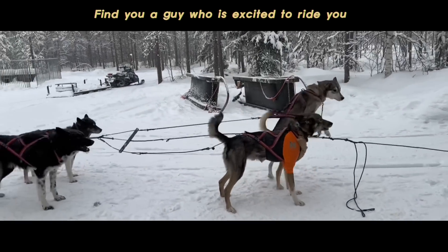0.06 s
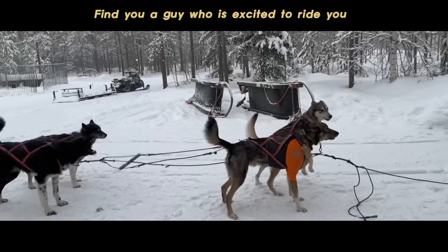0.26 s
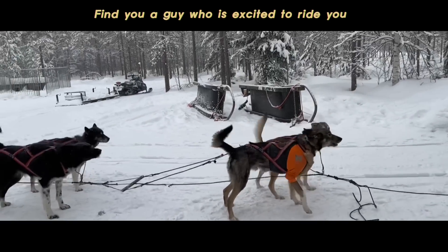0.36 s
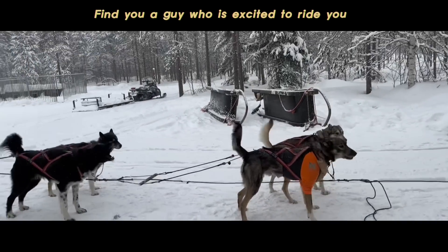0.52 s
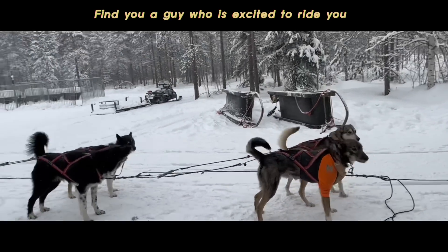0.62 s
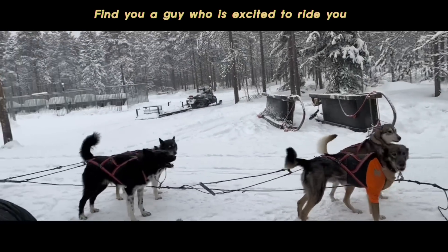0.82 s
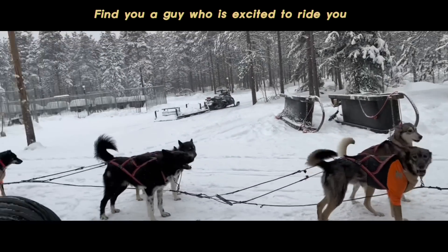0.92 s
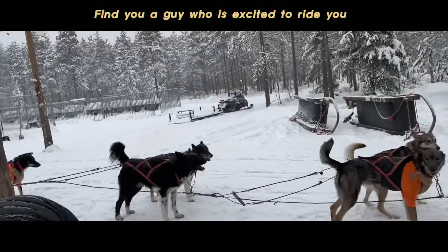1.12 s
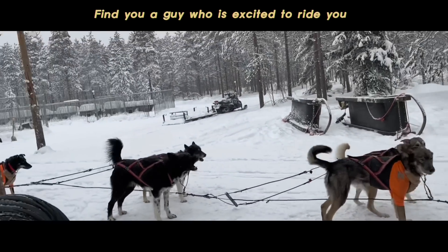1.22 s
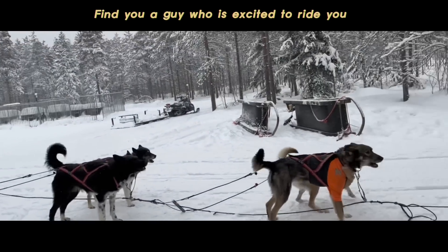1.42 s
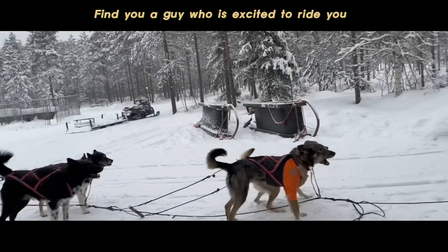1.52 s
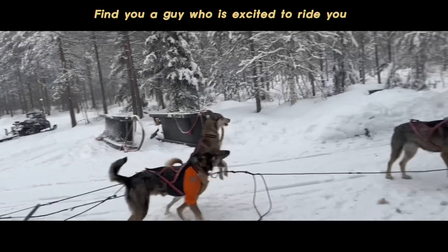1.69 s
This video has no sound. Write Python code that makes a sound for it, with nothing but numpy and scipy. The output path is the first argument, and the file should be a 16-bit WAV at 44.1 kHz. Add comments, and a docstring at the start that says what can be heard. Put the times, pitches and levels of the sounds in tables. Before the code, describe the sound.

A sled dog yelps three times, each cry starting low and cracking upward. Other dogs whine with thin nasal whistles, and a soft howl begins at the end. Paws scuff faintly on snow beside a quiet forest.

```python
"""A harnessed sled dog yelps three times on snow at a forest's edge, just after an earlier yelp ends.
Each yelp starts low, cracks up into a high register and falls away. By the source-filter principle,
the vocal folds supply harmonics and the resonances of throat and mouth weight them.
Other dogs whine and howl, with thin nasal whistles on top; paws scuff the snow,
and the trunks scatter back a faint echo over the quiet of the forest."""
import sys
import numpy as np
from scipy import signal
from scipy.fft import rfft, irfft
from scipy.io import wavfile
from scipy.ndimage import uniform_filter1d

SR = 44100
rng = np.random.default_rng(int(sys.argv[2]) if len(sys.argv) > 2 else 0)


def int16_out(signal):
    """Quantize to a 16-bit WAV file."""
    q = np.round(np.clip(np.atleast_2d(signal).T, -1, 1) * 32767)
    wavfile.write(sys.argv[1], SR, q.astype(np.int16))


N = 77175

# Contours of the vocal folds, with levels taken before the throat's filter (t/s, f/Hz, level/dB)
LOW_REGISTER = [
    [(0, 708, -7.5), (.008, 705, -26)],
    [(.175, 350, -21.5), (.193, 511, -28.5), (.204, 580.3, -11.5), (.222, 597, -10), (.232, 625, -23.5)],
    [(.437, 425, -19.5), (.453, 490, -33), (.472, 604.4, -18), (.495, 625, -17), (.507, 701, -20)],
    [(1.172, 299.8, -25), (1.203, 448, -35), (1.222, 581.3, -20.5), (1.245, 618.5, -19),
     (1.263, 687, -38.5)],
]  # one per yelp, the first already ending
HIGH_REGISTER = [
    [(.228, 907, -16.5), (.243, 987, -20), (.256, 954.5, -14.5), (.268, 994, -8.5), (.292, 1027, -11.5),
     (.303, 898, -22)],
    [(.503, 880, -20), (.519, 946.6, -18.5), (.531, 1041, -8.5), (.598, 1087, -11.5), (.611, 1043, -15.5),
     (.623, 807, -28), (.634, 601, -28.5), (.645, 464, -30.5)],
    [(1.25, 909, -26.5), (1.264, 929.7, -24.5), (1.28, 1104, -12.5), (1.3, 1154, -8), (1.319, 1108, -16),
     (1.331, 846, -22.5), (1.343, 603, -36), (1.355, 485, -31)],
]  # one per full yelp
BIPHONATION = [(.508, 595, -39), (.565, 694, -42.5), (.571, 801, -31), (.604, 840, -38)]  # second tone under the middle yelp
WHINE_CONTOURS = [
    [(.68, 1130, -59.5), (.735, 1106, -38), (.757, 1233, -35.5), (.778, 1155, -34.5), (.793, 1346, -33.5),
     (.843, 1333, -35.5), (.895, 1159, -39.5)],
    [(.89, 1172, -38.5), (.935, 1152, -36), (.955, 1177, -29), (1.025, 1170, -31.5), (1.07, 1240, -40)],
    [(.945, 1290, -31.5), (.965, 1340, -31.5), (.997, 1253, -32.5), (1.01, 1325, -31), (1.055, 1302, -28),
     (1.08, 1350, -24), (1.165, 1374, -21), (1.3, 1383, -26.5), (1.355, 1369, -27), (1.372, 1385, -45),
     (1.395, 1390, -35)],
    [(1.402, 1233, -27), (1.42, 1325, -24), (1.45, 1353, -25), (1.492, 1312, -23.5), (1.526, 1351, -31),
     (1.555, 1120, -67)],
]
HOWL_CONTOUR = [(1.45, 1096, -46.5), (1.52, 1074, -41), (1.75, 1047, -33)]
# Irregularity of the folds, one value per call
HIGH_ROUGHNESS = [.55, .06, .2]  # (roughness, 0-1)
WHINE_JITTER = [.011, .004, .002, .003]  # (fraction of the pitch)
# Nasal whistles (t/s, f/Hz, level/dB)
WHISTLE_CONTOURS = [
    [(.44, 5780, -62.5), (.535, 5350, -47), (.58, 5234, -74.5), (.76, 5300, -59.5), (.84, 5704, -40.5),
     (1.01, 5624, -49), (1.05, 5380, -40.5), (1.18, 5364, -53), (1.6, 5456, -53.5), (1.75, 5490, -44)],
    [(.615, 6100, -59), (.73, 5960, -69), (.8, 6250, -47), (.86, 5980, -54)],
]
# Calls of the distant pack (onset t/s, duration/s, f/Hz, level/dB)
PACK_CALLS = [(.01, 0.15, 912, -51.5), (1.468, 0.3, 744, -51), (1.475, .28, 915, -51)]
# Noise bursts (peak t/s, rise/s, decay/s, level/dB)
RASP_BURSTS = [(0, 0.0028, 0.023, -27.5), (.24, 0.014, 0.026, -15.5), (.288, 0.023, 0.019, -16.5),
               (.46, 0.025, 0.018, -35.5), (.505, 0.0023, 0.011, -36), (.632, 0.012, 0.0028, -39.5),
               (1.252, 0.014, 0.016, -30.5), (1.337, 0.0071, 0.012, -35)]
PAW_SCUFFS = [(.28, 0.045, 0.051, -41), (.425, 0.1, 0.017, -40)]
# Frequency response of throat and mouth (f/Hz, gain/dB)
YELP_TRACT = [(240, -41.5), (380, -16.5), (520, -2.5), (620, 5), (830, -11), (930, -9.5), (1040, 0),
              (1160, -3.5), (1400, -5.5), (1700, -2), (2120, -5.5), (2300, -4), (2720, -16.5), (3000, -16),
              (3900, -44.5), (5500, -36.5), (8000, -25.5), (11000, -30.5)]
WHINE_TRACT = [(1400, 1.5), (2400, -4), (2700, -6.5), (3500, -19.5), (4200, -14), (5400, -26.5),
               (8200, -31), (9600, -19.5)]
# Noise spectra (f/Hz, relative spectrum level/dB)
BREATH_SPECTRUM = [(2000, -39), (4500, -7.5), (7200, -2.5), (11000, -8)]
FOREST_SPECTRUM = [(20, -17.5), (50, -2), (260, -9), (750, -7.5), (3500, -19), (11000, -23.5)]
SNOW_SPECTRUM = [(1000, -3), (6000, -3)]
# Balance between the channels (f/Hz, left minus right level/dB)
YELP_BALANCE = [(600, 3), (1050, 6), (2150, 0), (3100, 7), (5000, -1)]
WHINE_BALANCE = [(1150, 0.5), (2350, 11.3), (2700, 13.8), (4100, 1)]
# Phase between the two microphone ports (f/Hz, lead of the left/rad)
PORT_PHASE = [(200, 0), (600, 0.44), (1800, 0.57), (2150, -1.65), (3200, -4.5), (5600, -5), (11000, -9)]

FADE_S, GLIDE_S = .0051, .006
SPLIT_CYCLES = 3  # cycles per repeat when the folds beat unevenly
OVERTONE_BLUR_RAD, OVERTONE_WAVER_DB = .14, 1.3  # per overtone; per octave above the pitch
YELP_FOLDS = dict(jitter=.0066, shimmer=.024, flutter_hz=280)
RASP_SLOPE_DB = -3.5  # per octave
YELP_BREATH_DB, FOREST_DB = -40, -53.5
ECHO_DB, ECHO_T60_S, ECHO_DELAY_S, ECHO_TOP_HZ = -33, 1, .0028, 2220
WHISTLE_OCTAVE_DB, WHISTLE_BREATH_DB = -1.5, -17.5
WHISTLE_AM_NEPERS, WHISTLE_FM_RAD = 1.5, .15  # swing per unit of fold motion
HISS_PEAK_S, HISS_RISE_S, HISS_DECAY_S, HISS_DB = 1.02, .092, .08, -40
TOP_HZ = 11900


def undb(db):
    """Amplitude ratio of a level in decibels."""
    return 10 ** (np.asarray(db) / 20)


def unit(x):
    """Normalisation to an rms of 1."""
    return x / np.sqrt(np.mean(x ** 2) + 1e-18)


def times():
    """Time of every sample, t/s."""
    return np.arange(N) / SR


def across(points):
    """Interpolation of a (f/Hz, value) table over log frequency, onto every bin."""
    hz, value = np.array(points, float).T
    return np.interp(np.log(np.arange(N // 2 + 1) * SR / N + 1), np.log(hz), value)


def noise(spectrum):
    """Spectral shaping of white noise, at an rms of 1."""
    return unit(irfft(rfft(rng.standard_normal(N)) * undb(across(spectrum)), N))


def wobble(hz):
    """Random fluctuation, low-passed at about hz, at an rms of 1."""
    f = np.arange(N // 2 + 1) * SR / N
    return unit(irfft(rfft(rng.standard_normal(N)) / (1 + (f / hz) ** 2) ** 2, N))


def controls(contour):
    """A call's gate, frequency and level, by smoothed interpolation."""
    knots, *columns = np.array(contour, float).T
    t = times()
    gate = np.clip(np.minimum(t - knots[0], knots[-1] - t) / FADE_S + .5, 0, 1)
    glide = int(GLIDE_S * SR) + 1
    return [gate] + [uniform_filter1d(np.interp(t, knots, c), size=glide) for c in columns]


def swells(bursts):
    """Incoherent addition: envelopes that rise and decay exponentially sum in power."""
    t = times()
    return np.sqrt(sum((undb(db) * np.exp(-np.maximum((peak - t) / rise, (t - peak) / decay))) ** 2
                       for peak, rise, decay, db in bursts))


def voice(contour, tract, slope_db, jitter, shimmer, flutter_hz, split=0):
    """Source-filter model: harmonics tilted by slope_db per octave pass the tract; gives sound, phase."""
    gate, hz, db = controls(contour)
    phase = 2 * np.pi * np.cumsum(hz * (1 + jitter * wobble(flutter_hz))) / SR
    tract_hz, tract_db = np.array(tract, float).T
    tone = 0
    for k in range(1, 8):
        resonance_db = np.interp(k * hz, tract_hz, tract_db)
        tilt_db = (slope_db + OVERTONE_WAVER_DB * wobble(38)) * np.log2(k)
        blur = OVERTONE_BLUR_RAD * (k - 1) * wobble(370)
        tone = tone + undb(resonance_db + tilt_db) * np.sin(k * phase + blur)
    flutter = shimmer * wobble(flutter_hz)
    subharmonic = split * (1 + .5 * wobble(flutter_hz)) * np.sin(phase / SPLIT_CYCLES)
    return np.sqrt(2) * undb(db) * gate * tone * (1 + flutter + subharmonic), phase


def yelps():
    """Register breaks: the folds jump from low to high, with chaotic rasp and air past the teeth."""
    low = sum(voice(contour, YELP_TRACT, slope_db=-12.5, **YELP_FOLDS)[0] for contour in LOW_REGISTER)
    high = 0
    for contour, roughness in zip(HIGH_REGISTER, HIGH_ROUGHNESS):
        folds = dict(YELP_FOLDS, jitter=.025 * roughness, split=.17 * roughness)
        high = high + voice(contour, YELP_TRACT, slope_db=-6, **folds)[0]
    second_tone = voice(BIPHONATION, YELP_TRACT, slope_db=2.5, **YELP_FOLDS)[0]
    rasp_spectrum = [(hz, db + RASP_SLOPE_DB * np.log2(hz)) for hz, db in YELP_TRACT]
    rasp = noise(rasp_spectrum) * swells(RASP_BURSTS)
    high_envelope = uniform_filter1d(np.abs(high), size=600)
    breath = undb(YELP_BREATH_DB) * high_envelope * noise(BREATH_SPECTRUM)
    return place(low + high + second_tone + rasp + breath, YELP_BALANCE)


def place(x, balance):
    """Level panning: each frequency is shared between left and right."""
    return irfft(rfft(x) * undb(np.outer([.5, -.5], across(balance))), N)


def forest():
    """Partial coherence: steady ambient noise, widened by a weak part in antiphase."""
    mid, side = noise(FOREST_SPECTRUM), noise(FOREST_SPECTRUM)
    return undb(FOREST_DB) * (mid + .14 * np.array([[1], [-1]]) * side)


def tree_echo(x):
    """Scattering by trunks: convolution with a dull, exponentially decaying impulse response."""
    t = times()
    onset = np.clip(t / ECHO_DELAY_S - 1, 0, 1)
    tails = rng.standard_normal((2, N)) * undb(-60 * t / ECHO_T60_S) * onset
    lowpass = signal.butter(2, ECHO_TOP_HZ, fs=SR, output="sos")
    mid, side = signal.sosfilt(lowpass, tails / np.sqrt(np.sum(tails[0] ** 2)))
    response = mid + 1.2 * np.array([[1], [-1]]) * side
    return undb(ECHO_DB) * signal.fftconvolve(x.mean(axis=0)[None], response, axes=1)[:, :N]


def distant_pack():
    """Spectral tilt: steeply falling harmonics make the faint, wavering far calls dull."""
    contours = [[(start, hz, db), (start + length, hz, db)] for start, length, hz, db in PACK_CALLS]
    return sum(voice(contour, WHINE_TRACT, slope_db=-21, jitter=.045, shimmer=.25, flutter_hz=57.5)[0]
               for contour in contours)


def snow_scuffs():
    """Friction noise: paws scuff the snow in grainy broadband bursts."""
    return swells(PAW_SCUFFS) * noise(SNOW_SPECTRUM) * undb(2.5 * wobble(180))


def nasal_whistle(contour, folds=0j):
    """Modulation: fold motion, a rotating phasor, pulses and bends a breathy whistle into sidebands."""
    gate, hz, db = controls(contour)
    phase = 2 * np.pi * np.cumsum(hz * (1 + .006 * wobble(150))) / SR
    fundamental = np.sin(phase + WHISTLE_FM_RAD * folds.real) * np.exp(WHISTLE_AM_NEPERS * folds.imag)
    octave = undb(WHISTLE_OCTAVE_DB) * np.sin(2 * phase)
    flicker = undb(2.68 * wobble(60))
    breath = undb(WHISTLE_BREATH_DB) * noise(BREATH_SPECTRUM)
    return np.sqrt(2) * gate * undb(db) * (flicker * (fundamental + octave) + breath)


def whines():
    """Jitter and shimmer: the team mates' folds waver; gives sound and the second whine's phasor."""
    calls = [voice(contour, WHINE_TRACT, slope_db=-4, jitter=jitter, shimmer=20 * jitter, flutter_hz=110)
             for contour, jitter in zip(WHINE_CONTOURS, WHINE_JITTER)]
    sounds, phases = zip(*calls)
    gate = controls(WHINE_CONTOURS[1])[0]
    return place(sum(sounds), WHINE_BALANCE), gate * np.exp(1j * phases[1])


def nasal_hiss():
    """Turbulence: air hisses through the nose in one swell that peaks just after 1 s."""
    return swells([(HISS_PEAK_S, HISS_RISE_S, HISS_DECAY_S, HISS_DB)]) * noise(BREATH_SPECTRUM)


def howl():
    """Sustained phonation: a dog farther back holds a near-steady pitch; gives sound and phasor."""
    sound, phase = voice(HOWL_CONTOUR, WHINE_TRACT, slope_db=-9, jitter=.0065, shimmer=.15, flutter_hz=50)
    gate = controls(HOWL_CONTOUR)[0]
    return sound, gate * np.exp(1j * phase)


def scene():
    """Superposition of the dogs, their echo, the scuffed snow and the forest."""
    yelping = yelps()
    whining, whine_folds = whines()
    howling, howl_folds = howl()
    pulsed_whistle = nasal_whistle(WHISTLE_CONTOURS[0], whine_folds + .34 * howl_folds)
    plain_whistle = nasal_whistle(WHISTLE_CONTOURS[1])
    dogs = yelping + whining + howling + pulsed_whistle + plain_whistle + nasal_hiss() + distant_pack()
    return dogs + snow_scuffs() + forest() + tree_echo(dogs)


def record(dry):
    """Phase shift: the two ports hear each frequency out of step; a low-pass cuts the top."""
    phase_shift = np.exp(1j * np.outer([0, -1], across(PORT_PHASE)))
    ports = irfft(rfft(dry) * phase_shift, N)
    return signal.sosfilt(signal.ellip(8, .2, 70, TOP_HZ, fs=SR, output="sos"), ports)


dry = scene()
out = record(dry)
int16_out(out)
```